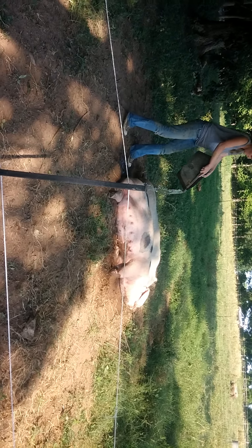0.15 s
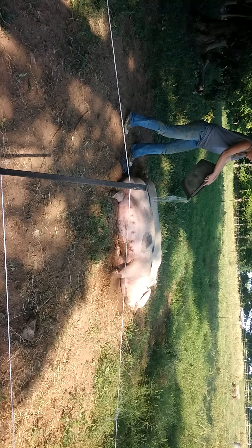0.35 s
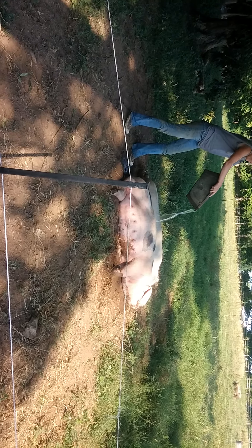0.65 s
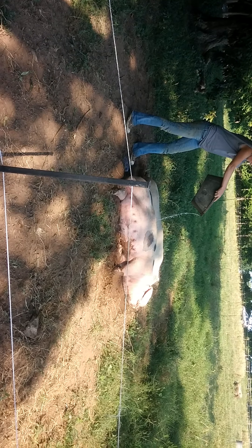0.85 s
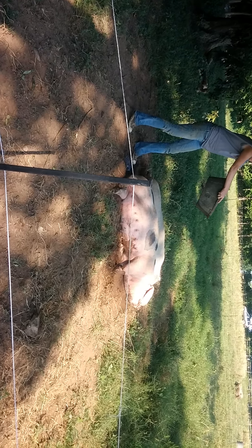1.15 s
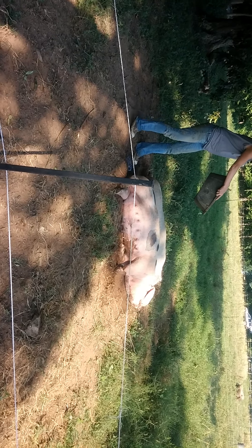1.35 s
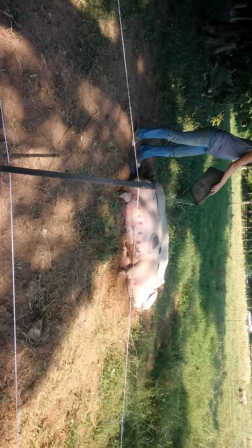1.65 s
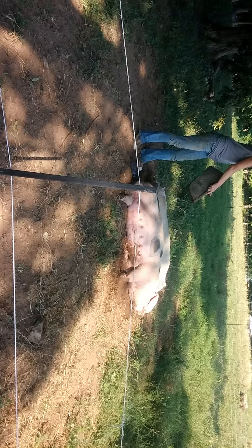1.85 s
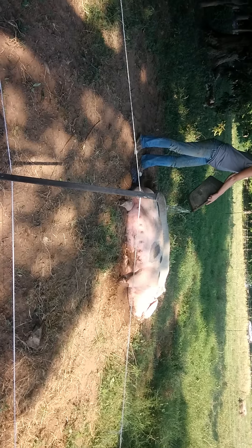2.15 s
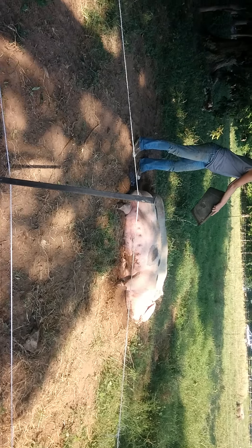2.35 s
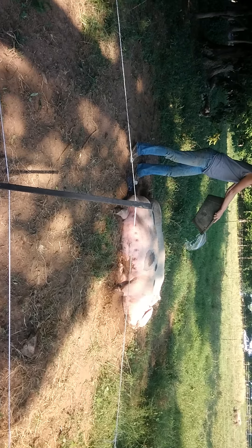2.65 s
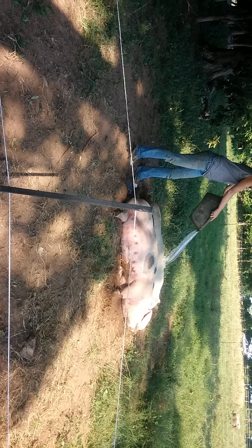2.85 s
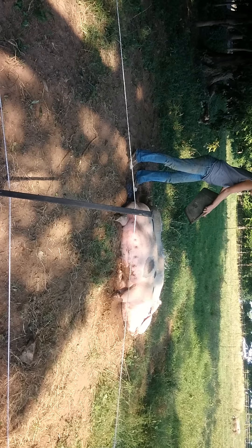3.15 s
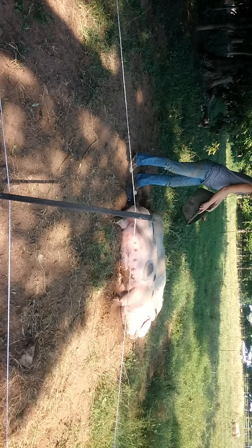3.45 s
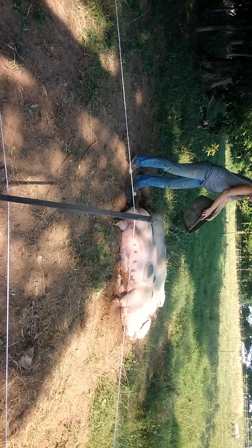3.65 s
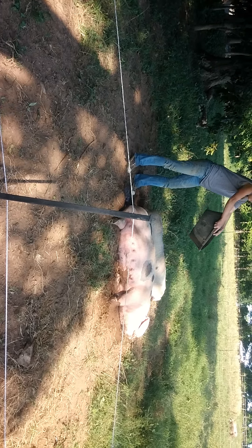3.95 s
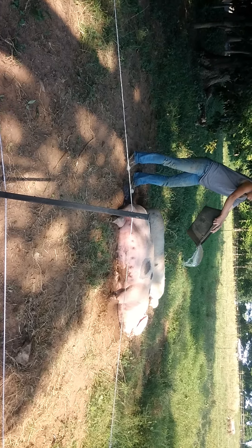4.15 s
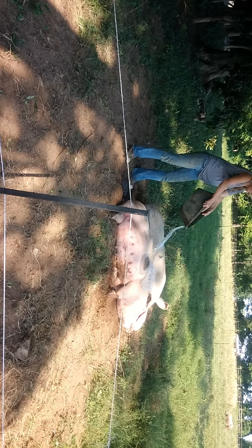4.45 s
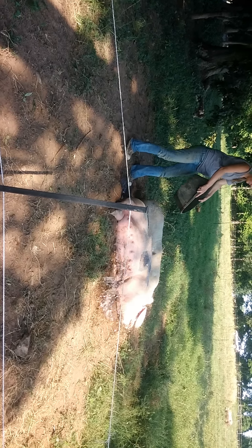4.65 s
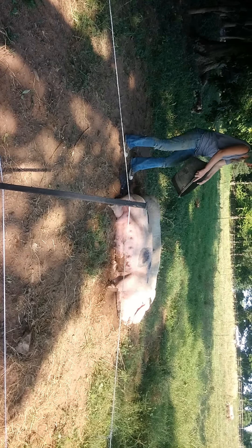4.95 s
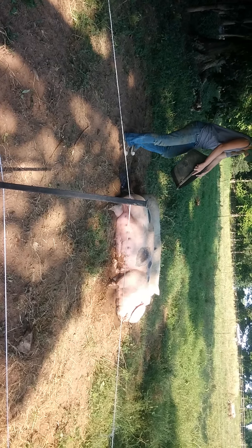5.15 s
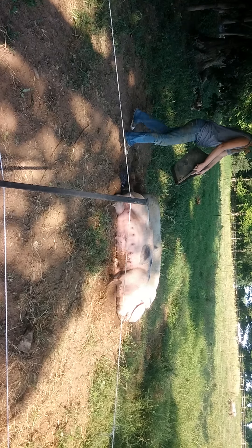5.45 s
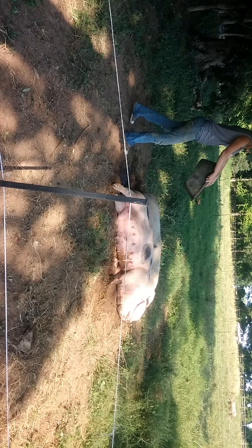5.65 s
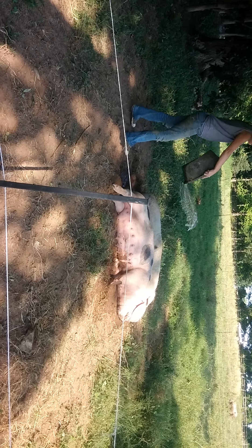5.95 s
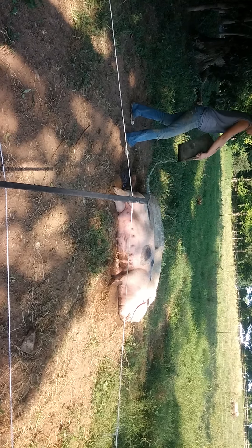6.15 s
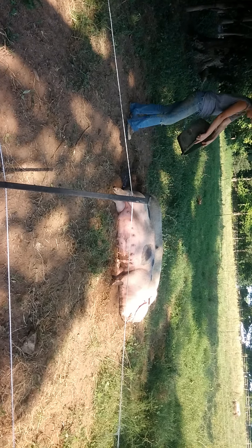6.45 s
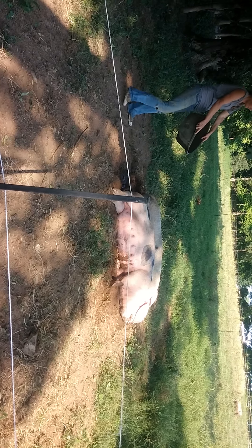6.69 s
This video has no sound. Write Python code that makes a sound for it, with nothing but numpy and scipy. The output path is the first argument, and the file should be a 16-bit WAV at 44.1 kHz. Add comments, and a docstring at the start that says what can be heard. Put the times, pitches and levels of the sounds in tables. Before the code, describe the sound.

Low flapping pig grunts and raspy nostril breaths, with small pours and two sharper splashes of water outdoors under bassy wind buffeting.

```python
"""Poured water hisses and gurgles from the start, and more is thrown over a sow's back from a bucket.
She grunts in short trains of slow throat flaps and breathes hard through her nostrils between them.
Wind buffets two microphone ports that face apart, over a faint steady hiss and with brief dips in level.
Water is noise, bubbles and drops; breath is noise rung by cavities; each flap is a push, a puff and a snap.
The left port hears sow and water duller and, in the bass, nearly upside down."""
import sys
import numpy as np
from scipy import signal
from scipy.fft import rfft, irfft, next_fast_len
from scipy.io import wavfile
from scipy.ndimage import map_coordinates

SR = 44100
rng = np.random.default_rng(int(sys.argv[2]) if len(sys.argv) > 2 else 0)


def ratio(d):
    """dB to gain"""
    e = np.asarray(d, float) / 20
    return 10 ** e


def to_wav(s):
    """Save 16-bit WAV."""
    ch = np.atleast_2d(s).T  # columns
    pcm = np.round(np.clip(ch, -1, 1) * 32767)  # PCM
    wavfile.write(sys.argv[1], SR, pcm.astype(np.int16))


N = 300762
SECONDS = np.arange(N) / SR

# Pours and throws of water. Each row: full flow in seconds, rise in seconds, hold in seconds,
# spray level in dB, gurgle level in dB.
SPLASHES = [(0, 1, 0.23, -48.5, -47.5), (0.678, 0.35, 0.13, -52, -54), (1.772, 0.12, 0.096, -49.5, -86),
            (3.024, 0.26, 0.16, -38.5, -37), (4.522, 0.14, 0.091, -37.5, -32.5),
            (4.793, 0.063, 0.035, -40.5, -70), (6.245, 0.0025, 0.03, -34, -41),
            (6.258, 0.041, 0.024, -35.5, -26.5)]
# Colour of the spray. Each row: frequency in Hz, density in dB per Hz (only the shape counts).
SPRAY = [(600, -38), (1000, -19.5), (2600, -0.5), (4500, -10.5), (7500, -7.5), (10000, -18), (15500, -26)]
# Single drops and slaps. Each row: start in seconds, level in dB before trims, starting pitch in Hz.
DROPS = [(0.003, -22.5, 3350), (0.1017, -29.5, 3200), (0.115, -30, 3000), (0.133, -28.5, 3200),
         (0.1645, -32.5, 2860), (0.1825, -28, 2640), (0.2048, -24, 3400), (1.9051, -35.5, 2700),
         (2.0278, -36, 7130), (2.195, -37.5, 3570), (2.3382, -29.5, 3500), (2.4044, -28.5, 2470),
         (2.4312, -31, 3090), (3.2122, -24, 2270), (4.514, -12, 3110), (4.5593, -14, 1990),
         (4.624, -27, 1570), (6.244, -25, 1285), (6.2709, -10, 2700), (6.294, -11, 1640),
         (6.358, -18, 3230)]
# Wind at each port. Each row: time in seconds, level in dB.
WIND_LEFT = [(0, -43.5), (.3, -37.5), (.49, -28), (.7, -37.5), (.82, -76), (.92, -39.5), (1.2, -20),
             (1.5, -35.5), (1.66, -21), (1.8, -28.5), (1.92, -14.5), (2.1, -32.5), (2.7, -32.5),
             (2.95, -61), (3.3, -39.5), (3.47, -27.5), (3.85, -25), (4.69, -39), (5.13, -30.5), (5.5, -36),
             (6.09, -41.5), (6.2, -25.5), (6.82, -32)]
WIND_RIGHT = [(0, -93.5), (3.75, -73), (3.95, -46.5), (4.35, -54), (4.63, -35), (5.4, -48), (6.1, -44),
              (6.21, -31), (6.82, -26)]
# Colour of the buffeting. Each row: frequency in Hz, density in dB per Hz (only the shape counts).
BUFFET = [(25, -82), (50, -7.5), (80, 1.5), (150, -9), (260, -28.5), (450, -70)]
# Gusts striking the left port, then the right. Each row: start in seconds, peak in dB before filtering.
THUMPS = [
    [(1.195, -4), (2.243, -6), (3.875, -9.5)],
    [(4.952, -9.5)],
]
# Colour of background hiss and self-noise. Each row: frequency in Hz, density in dB per Hz
# (only the shape counts).
HISS = [(200, 18.5), (900, 16), (3000, 10.5), (8000, 5), (11000, -0.5), (15500, -10)]
# Breaths. Each row: peak in seconds, rise in seconds, hold in seconds, level in dB,
# upper nostril notes in dB over that.
BREATHS = [(0.298, 1, 0.034, -54.5, -12.5), (0.825, 0.63, 0.12, -48, -2), (1.66, 0.16, 0.13, -40.5, 0.5),
           (2.722, 0.21, 0.096, -37.5, 0.5), (3.466, 0.28, 0.11, -49, 1.5),
           (3.785, 0.096, 0.14, -56.5, 6.5), (4.468, 0.17, 0, -35.5, -2), (4.78, .1, 0, -44, -3),
           (5.358, 0.34, 0.022, -51, 0.5), (6.06, 0.2, 0.17, -51.5, 3)]
# Nostril resonances. Each row: centre in Hz, width in Hz, gain in dB.
NOSTRILS = [(830, 123, 8.5), (1710, 215, -0.5), (2510, 280, 1.5)]
# Trains of throat flaps. Each row: first flap in seconds, last flap in seconds, number of flaps,
# slowing as an exponent on their spacing, place 0-1 in the train where the throat is loudest,
# throat level in dB, swell up to it in dB per second, place 0-1 where the snap is loudest,
# snap level in dB, mouth opening before it is scaled along the train and clipped at 1,
# nostril flare 0-1.
GRUNTS = [(0.218, 0.336, 4, 0.99, 0.54, -18, 150, .7, -48, 0, 0.2),
          (0.596, 0.685, 5, 1.46, 0.93, -0.5, 146, 1, -10.5, 0.9, 0.1),
          (0.873, 0.907, 2, 1.1, 0.82, -6.5, 200, 0, -10, 2.2, 0.2),
          (1.458, 1.551, 4, 1.18, 0.83, 0.5, 191, 0.44, -12.5, 0.42, 0.02),
          (2.494, 2.567, 3, 0.98, 0.75, -4.5, 252, 0.44, -19, 0.54, 0.14),
          (3.371, 3.423, 4, 0.92, 1, -5.5, 254, 1, -8.5, 0.76, 0),
          (4.153, 4.222, 3, 1.09, 0.45, -4, 33, 0.02, -10.5, 0.54, 0.18),
          (4.968, 5.059, 5, 1.09, 0.14, -3, 248, 0.4, -8.5, 2.07, 0.76),
          (5.101, 5.23, 6, 1.08, 0.53, -12.5, 216, 0.46, -7.5, 0.94, 0.8),
          (5.293, 5.362, 4, 0.76, 0.27, -16, 80, 0.18, -21.5, 0.5, 0.9),
          (5.746, 5.809, 4, 1.23, 0.98, -2.5, 203, 1, -11.5, 1.3, 0.41),
          (5.976, 6.003, 2, 1.1, 0.76, -17, 150, 0.07, -12, 0.56, 0.35),
          (6.128, 6.211, 4, 1.7, 0.92, -10, 110, 0.3, -21, 0.04, 0.74),
          (6.693, 6.785, 4, 1.17, 0.77, 1, 238, 0.74, -6, 1.4, 0.79)]
# Throat resonances, mouth shut and open. Each row: centre in Hz, width in Hz, gain in dB.
THROAT_SHUT = [(498, 190, -11.5), (775, 118, 1.5), (1170, 41, -17.5), (1810, 210, -4)]
THROAT_OPEN = [(510, 200, -7), (740, 150, -2), (1180, 42, 10), (1783, 65, 0)]
# Chest resonances that boom on after each flap. Each row: centre in Hz, width in Hz, gain in dB.
CHEST = [(85, 52, 3.5), (194, 46, 6.5), (294.3, 50.4, 6)]
# Snout resonances rung by the snap, at rest and flared. Each row: centre in Hz, width in Hz, gain in dB.
SNOUT = [(1814, 93, 2.5), (2530, 90, 5.5), (3277, 105, -1.5)]
SNOUT_FLARED = [(2700, 75, 4), (3220, 184, 4), (3710, 116, 6.5)]
# Left port against right. Each row: frequency in Hz, gain in dB, phase lead in radians, likeness 0-1.
LEFT_PORT = [(261, 1.5, 3.09, 0.64), (1000, 0, 1.944, 0.89), (1030, 2, 1.33, 0.93),
             (2170, -18.5, 2.58, 0.92), (2640, -18.5, 1.83, 0.2), (4530, -17, 4.2, 0),
             (7800, -20.5, 1.94, 1), (15000, -9, 2.4, 1)]
# Brief dips in level. Each row: centre in seconds, width in seconds, depth in dB.
DIPS = [(0.069, 0.044, 18.5), (0.573, 0.043, 8), (1.433, 0.051, 22), (2.362, 0.046, 9), (2.912, 0.075, 40),
        (3.3, 0.056, 19), (3.729, 0.1, 34), (5.271, 0.029, 17), (5.45, 0.053, 14), (5.558, 0.05, 29)]

RISE_DB = 30  # climb of a breath or splash over its rise time
DRAIN_DB_PER_S, GURGLE_FADE_DB_PER_S, GURGLE_LAG_S, TRICKLE_DB = 103.5, 289, 0.024, -66
SPATTER_DB, SPATTER_HZ = -7, 3340  # stray droplets against the flow, and their middle pitch
BREATH_FADE_DB_PER_S = 172
FLUTTER_DB = 4  # scales each of two random curves
SNAP_SWELL_DB_PER_S, SNAP_FADE_DB_PER_S, SNAP_SCATTER_DB = 285, 170, 3.5
FADE_OVER_SWELL = 0.92  # throat fall rate over its swell rate
SOFT_DB_PER_S = 30  # flaps away from the loudest lose some of their hard push
PUFF, SNAP_PUFF = .3, .55  # ragged air beside the clean push and click
PARTING_S, PARTING = 0.00406, 0.31  # the folds part with a weak push before they slap shut
CHEST_GROWS = 0.47  # extra dB of boom for each dB of throat
THROAT_SHIFT, SNOUT_SHIFT = .02, .04  # share by which throat and flared snout retune between flaps
FLARED_LAG_S_PER_HZ = 3.2e-6  # higher flared notes come later, so the snap chirps upward
NASAL_NOTCH_HZ, NOTCH_WIDTH_HZ = 1430, 220  # a side cavity swallows this band
SELF_NOISE_DB, TOP_HZ = -77, 15800


def unit(x):
    """Scales to rms 1."""
    return x / np.std(x)


def along(points, hz):
    """Reads each column after the frequency on a log axis."""
    f, *cols = np.transpose(points)
    return [np.interp(np.log(hz + 1), np.log(f + 1), c) for c in cols]


def curves(rows):
    """Reads each column after the time, one value a sample."""
    s, *cols = np.transpose(rows)
    return [np.interp(SECONDS, s, c) for c in cols]


def wobble(rate):
    """Draws a smooth random curve with rate knots a second."""
    knots = rng.standard_normal(int(N * rate / SR) + 4)
    return map_coordinates(knots, [SECONDS * rate])


def filtered(x, response):
    """Multiplies the spectrum of x by a complex response of frequency."""
    m = next_fast_len(N + 8192)
    return irfft(rfft(x, m) * response(np.fft.rfftfreq(m, 1 / SR)), m)[..., :N]


def cavities(modes):
    """Gives the causal response of a row of resonances, alternating in sign."""
    def response(f):
        return sum((-1) ** k * ratio(db) * 1j * f * width / (centre * centre - f * f + 1j * f * width)
                   for k, (centre, width, db) in enumerate(modes))
    return response


def rush(spectrum):
    """Makes two unrelated coloured noises of rms 1."""
    white = rng.standard_normal((2, N))
    return unit(filtered(white, lambda hz: ratio(along(spectrum, hz)[0])))


def bubbles(s, hz, peak, cycles, rise, size_n=500):
    """Sums damped sines whose pitch climbs; each swells for the given cycles, then dies."""
    age = hz[:, None] * np.arange(size_n) / SR / cycles
    tone = np.sin(2 * np.pi * cycles * age * (1 + rise * age))
    wave = peak[:, None] * tone * age * np.exp(1 - age)
    at = (s * SR).astype(int)[:, None] + np.arange(size_n)
    return np.bincount(at.ravel(), wave.ravel(), N + size_n)[:N]


def swells(peak_s, rise_s, hold_s, db, fall_db_per_s):
    """Sums the gains of events that climb RISE_DB, hold, then die away."""
    early = peak_s[:, None] - SECONDS
    late = SECONDS - (peak_s + hold_s)[:, None]
    climb_db = RISE_DB * np.maximum(early, 0) / np.maximum(rise_s, .002)[:, None]
    return ratio(db[:, None] - climb_db - fall_db_per_s * np.maximum(late, 0)).sum(0)


def water():
    """Spray hisses, clumps of small bubbles gurgle, and single drops slap hide and ground."""
    full_s, rise_s, hold_s, spray_db, gurgle_db = np.transpose(SPLASHES)
    flow = swells(full_s, rise_s, hold_s, spray_db, DRAIN_DB_PER_S) + ratio(TRICKLE_DB)
    churn = swells(full_s + GURGLE_LAG_S, rise_s, hold_s, gurgle_db, GURGLE_FADE_DB_PER_S)
    clumps = ratio(2.82 * wobble(45))
    spray = rush(SPRAY) * ratio(1.7 * wobble(270))

    when = rng.random((2, 20000))
    chance = rng.standard_normal((2, 2, 20000))
    # a heavier flow traps larger, deeper bubbles
    hz = 1240 * np.exp(0.365 * chance[0]) * flow[(when * N).astype(int)] ** -.158
    gurgle = unit([bubbles(when[k] * N / SR, hz[k], ratio(4.9 * chance[1, k]), cycles=6.0, rise=0, size_n=300)
                   for k in range(2)])

    s, pitch, size = rng.random((2500, 3)).T
    spatter_hz = SPATTER_HZ * np.exp(.7 * (pitch - .5))
    spatter = unit(bubbles(s * N / SR, spatter_hz, size ** 3, cycles=2.4, rise=0.029))

    s, db, hz = np.transpose(DROPS)
    drops = bubbles(s, hz, ratio(db - 0.5), cycles=3.06, rise=0.041)
    # each drop also sets off a dying burst of spray noise
    hits = np.bincount((s * SR).astype(int), ratio(1.174 * db), N)
    slap = filtered(hits, lambda f: 1 / (1 + 1j * f * 0.034)) * rush(SPRAY)

    direct = clumps * (flow * spray + churn * gurgle) + ratio(SPATTER_DB) * flow * spatter + drops + 100 * slap
    # echoes between hide and ground comb the splash into bands
    return filtered(direct, lambda f: 1 / (1 - 0.32 * np.exp(-2j * np.pi * f / 860 - f / 6000)))


def wind():
    """Lumpy low noise buffets each port on its own, and a few hard gusts thump as short damped sines."""
    lumps = ratio(9.3 * np.tanh(np.array([wobble(22), wobble(22)])))
    level = ratio([curves(WIND_LEFT)[0], curves(WIND_RIGHT)[0]])
    buffet = level * unit(lumps * rush(BUFFET))
    gusts = [bubbles(s, np.full_like(s, 120), ratio(db), cycles=0.33, rise=0.037, size_n=2500)
             for s, db in map(np.transpose, THUMPS)]
    # trims the gusts below 45 Hz and above 350 Hz
    return buffet + filtered(np.array(gusts), lambda hz: (1j * hz / (45 + 1j * hz) / (1 + 1j * hz / 350)) ** 2)


def background_hiss():
    """Coloured noise makes a faint steady background hiss, unrelated from port to port."""
    return ratio([[-60], [-60]] + 0.2 * wobble(7.3)) * rush(HISS)


def breath():
    """Air rasps through the nostrils, fluttering as the soft palate shakes."""
    peak_s, rise_s, hold_s, db, upper_db = np.transpose(BREATHS)
    rasp = ratio(FLUTTER_DB * (wobble(50) + wobble(140))) * rng.standard_normal((2, N))
    low = filtered(rasp, cavities(NOSTRILS[:1]))
    upper = filtered(-rasp, cavities(NOSTRILS[1:]))
    low, upper = unit(np.array([low, upper])) / np.sqrt(2)
    low_gain = swells(peak_s, rise_s, hold_s, db, BREATH_FADE_DB_PER_S)
    upper_gain = swells(peak_s, rise_s, hold_s, db + upper_db, BREATH_FADE_DB_PER_S)
    return low_gain * low + upper_gain * upper


def jolt(age):
    """A flap's pressure jumps up and dies within a millisecond or so."""
    return age / 0.00017 * np.exp(1 - age / 0.00012)


def blend(share):
    """Splits a flap's power between two cavity shapes."""
    return np.sqrt(np.clip([1 - share, share], 0, 1))[:, None, None]


def grunts():
    """Each flap pushes and puffs into throat and chest and snaps the snout; the mouth opens along a train."""
    # axes: retuning, cavity shape, track, sample
    push, snap = np.zeros((2, 3, 2, 2, N + 4000))
    boom = np.zeros((2, N + 4000))
    t = np.arange(4000) / SR - .01
    after = np.maximum(t, 0)
    leak = .3 * ratio(60 * t / 0.018) * (t < 0)  # air slips through before the flap's main push
    blow = jolt(after) + PARTING * jolt(np.maximum(t + PARTING_S, 0))
    click = -4 * (after > 0) * np.exp(-after / 0.00004)
    snap_air = (t > 0) * (SNAP_PUFF * ratio(-60 * after / 0.0096) + 0.049 * ratio(-60 * after / 1.8))

    for (first, last, flaps, slowing, loudest, throat_db, swell,
         snappiest, snap_db, opened, flared) in GRUNTS:
        for part in np.linspace(0, 1, round(flaps)) ** slowing:
            at = round((first + part * (last - first) - .01) * SR)
            off_s = (part - loudest) * (last - first)
            early, late = max(-off_s, 0), max(off_s, 0)
            snap_off_s = (part - snappiest) * (last - first)
            snap_early, snap_late = max(-snap_off_s, 0), max(snap_off_s, 0)
            puff = rng.standard_normal((2, 2, 4000)) * np.cos(np.pi / 2 * after / after[-1])
            shape = rng.integers(len(snap))

            # the puff lasts longer the further the flap is from the loudest one
            puff_s = 0.012 + 0.07 * (early + late)
            ragged = leak + (t > 0) * (PUFF * ratio(-60 * after / puff_s) + 0.05 * ratio(-60 * after / 0.5))
            throat_gain = ratio(throat_db - swell * (early + FADE_OVER_SWELL * late))
            flap = throat_gain * (blow * ratio(-SOFT_DB_PER_S * (early + late)) + puff[0] * ragged)
            push[shape, ..., at:at + 4000] += blend(opened * (0.32 + 0.69 * part)) * flap
            boom[:, at:at + 4000] += ratio(CHEST_GROWS * throat_db) * flap

            flap_snap_db = snap_db + SNAP_SCATTER_DB * rng.standard_normal()
            flap_snap_db -= SNAP_SWELL_DB_PER_S * snap_early + SNAP_FADE_DB_PER_S * snap_late
            crack = ratio(flap_snap_db) * (click + puff[1] * snap_air)
            snap[shape, ..., at:at + 4000] += blend(flared) * crack

    def chirp(hz):
        return np.exp(-1j * np.pi * FLARED_LAG_S_PER_HZ * (hz - 2500) ** 2)

    voice = filtered(boom[:, :N], cavities(CHEST))
    for k, shape in enumerate((-1, 0, 1)):
        throat, snout = 1 + THROAT_SHIFT * shape, 1 + SNOUT_SHIFT * shape

        def throat_response(hz):
            return np.array([[cavities(m)(hz * throat)] for m in (THROAT_SHUT, THROAT_OPEN)])

        def snout_response(hz):
            # at rest the snout retunes with the throat
            return np.array([[cavities(SNOUT)(hz * throat)], [cavities(SNOUT_FLARED)(hz * snout) * chirp(hz)]])

        voice = voice + filtered(push[k, ..., :N], throat_response).sum(0)
        voice = voice + filtered(snap[k, ..., :N], snout_response).sum(0)

    notch = cavities([(NASAL_NOTCH_HZ, NOTCH_WIDTH_HZ, -1)])
    return filtered(voice, lambda hz: (1 - notch(hz)) / (1 + (hz / 4100) ** 14))


def ports(pair):
    """The right port takes the first track; the left a turned, duller blend of both."""
    def left(hz):
        db, lead, alike = along(LEFT_PORT, hz)
        alike = np.clip(alike, 0, 1)
        return ratio(db) * np.exp(1j * lead) * [alike, np.sqrt(1 - alike ** 2)]
    return np.array([filtered(pair, left).sum(0), pair[0]])


def scene():
    """Sow and water come through the ports, with wind on them and a faint steady background hiss."""
    return ports(water() + breath() + grunts()) + wind() + background_hiss()


def roll_off(x):
    """The treble ends steeply here."""
    return signal.sosfilt(signal.butter(12, 16440, fs=SR, output="sos"), x)


def record(dry):
    """The level dips briefly over the microphone's own steady hiss, and the top is cut off sharply."""
    dip_db = sum(depth * np.exp(-(2 * (SECONDS - s) / width) ** 4) for s, width, depth in DIPS)
    noisy = dry * ratio(-dip_db) + ratio(SELF_NOISE_DB) * rush(HISS)
    mix = filtered(noisy, lambda hz: hz < TOP_HZ)
    return roll_off(mix)


dry = scene()
out = record(dry)
to_wav(out)
```